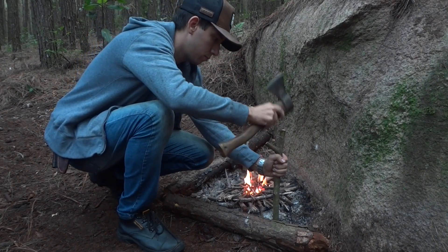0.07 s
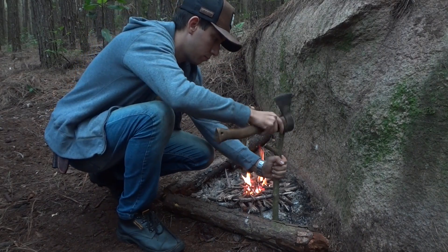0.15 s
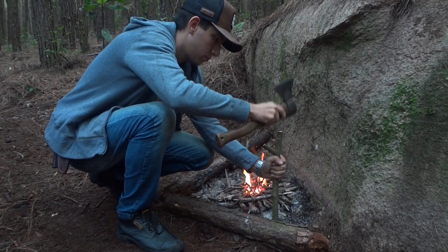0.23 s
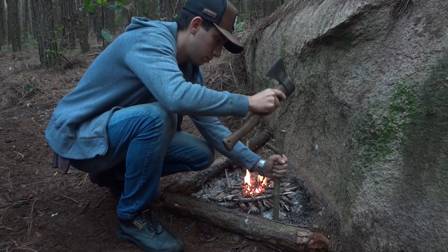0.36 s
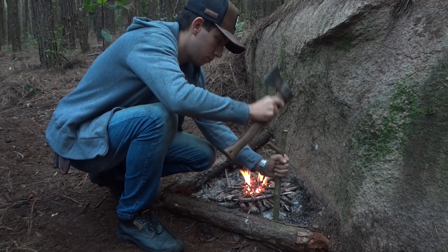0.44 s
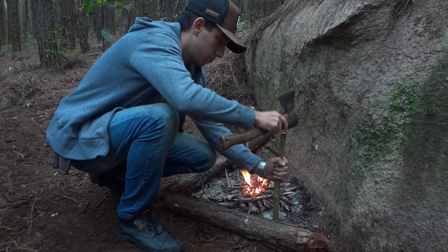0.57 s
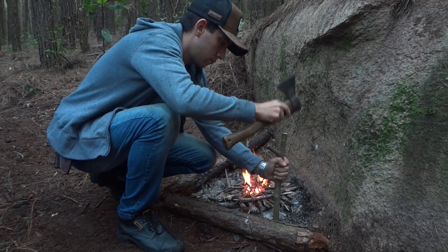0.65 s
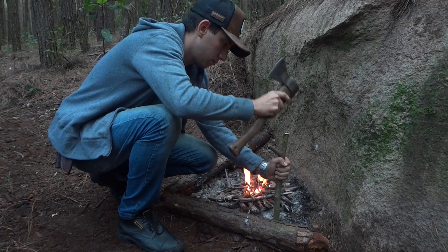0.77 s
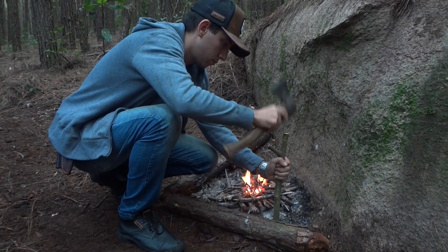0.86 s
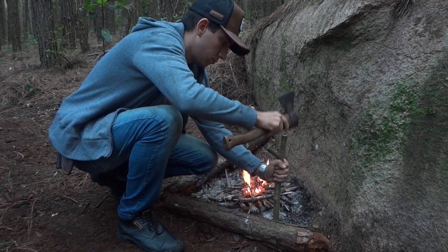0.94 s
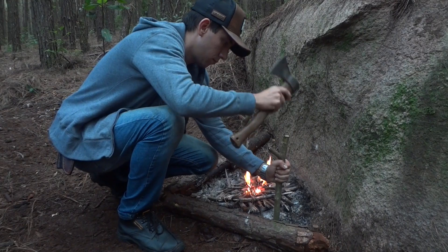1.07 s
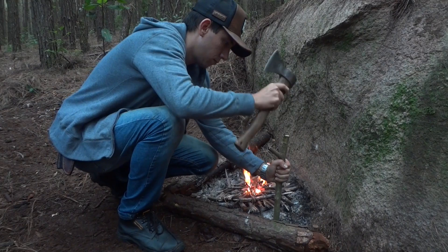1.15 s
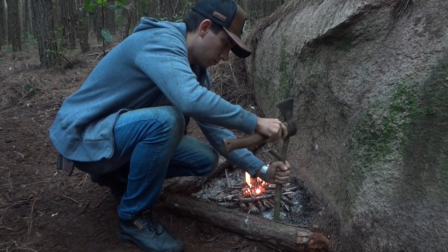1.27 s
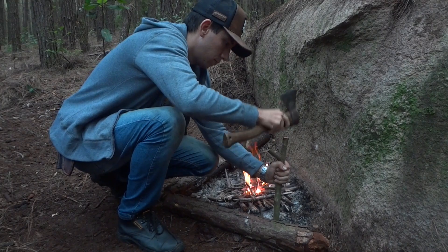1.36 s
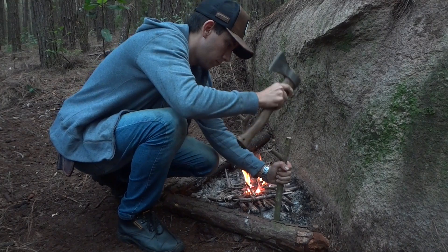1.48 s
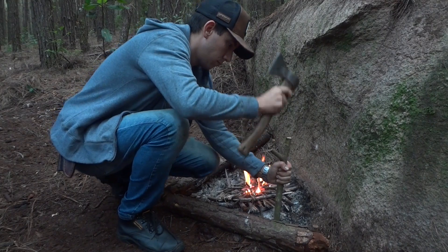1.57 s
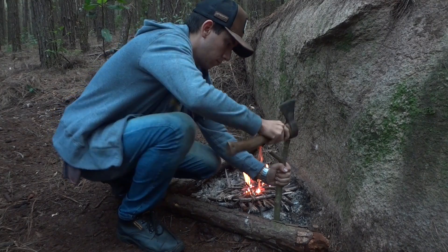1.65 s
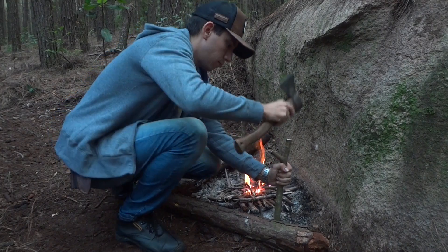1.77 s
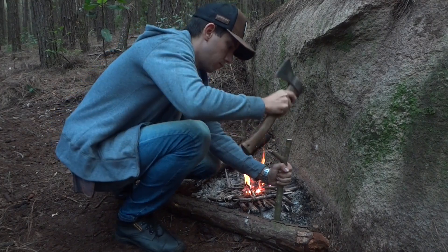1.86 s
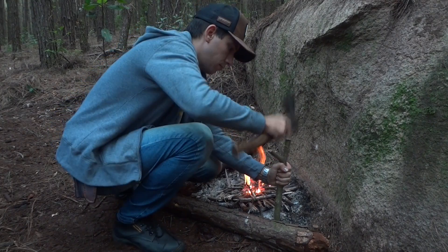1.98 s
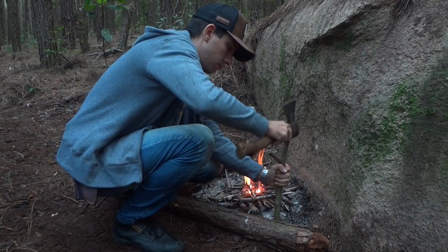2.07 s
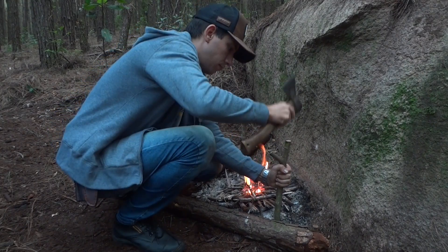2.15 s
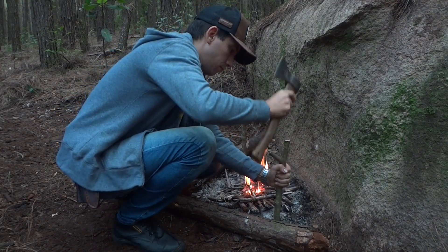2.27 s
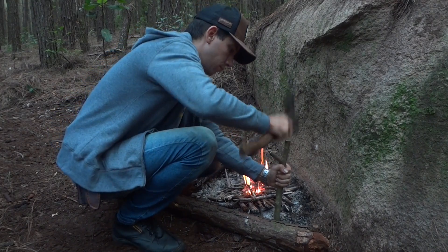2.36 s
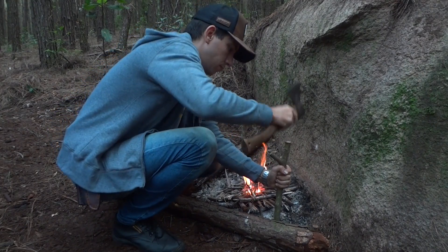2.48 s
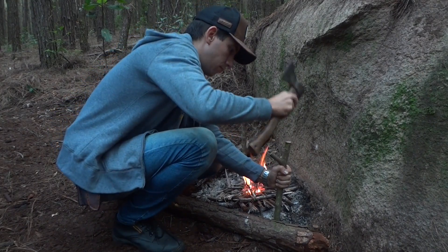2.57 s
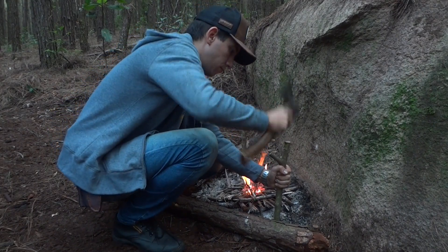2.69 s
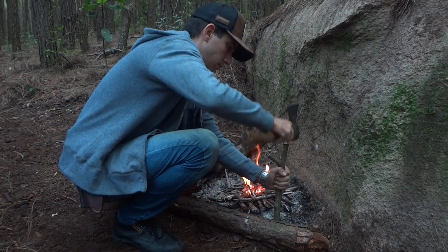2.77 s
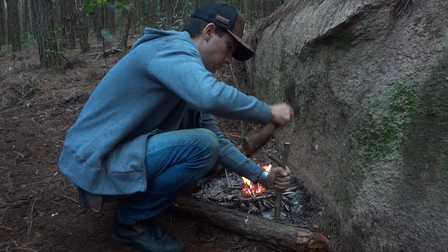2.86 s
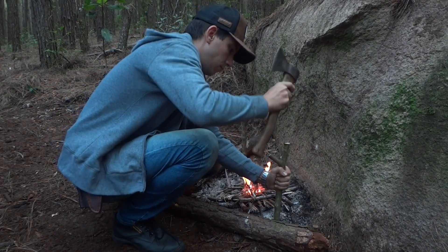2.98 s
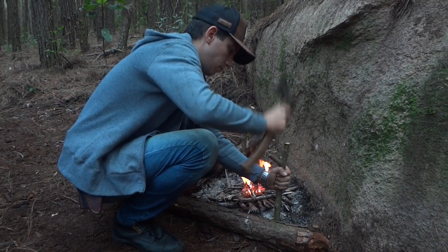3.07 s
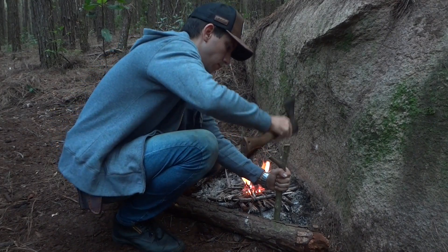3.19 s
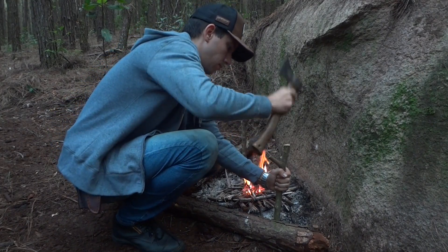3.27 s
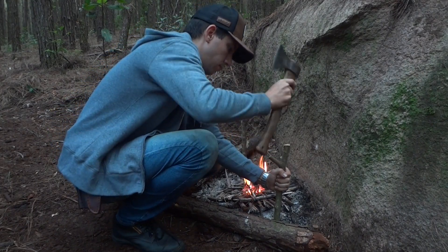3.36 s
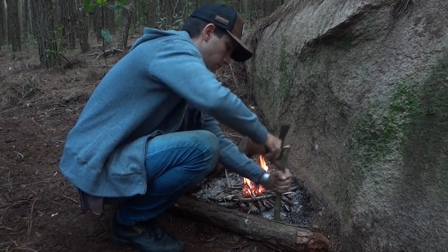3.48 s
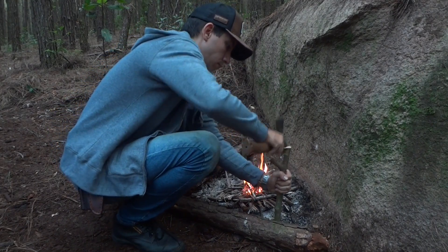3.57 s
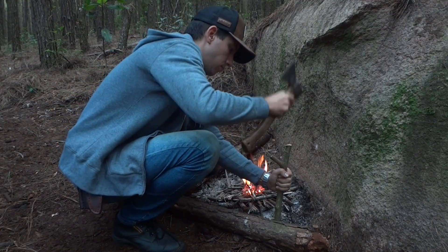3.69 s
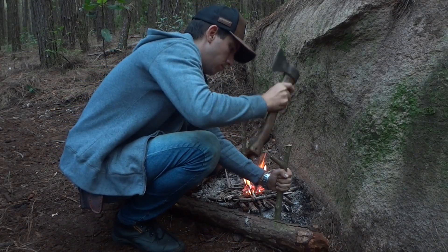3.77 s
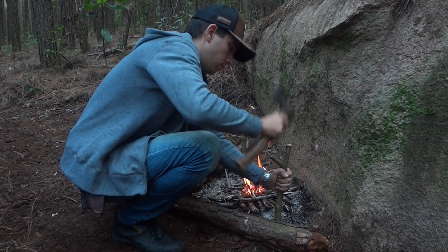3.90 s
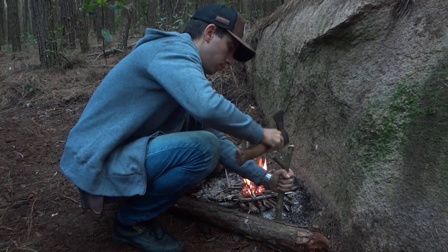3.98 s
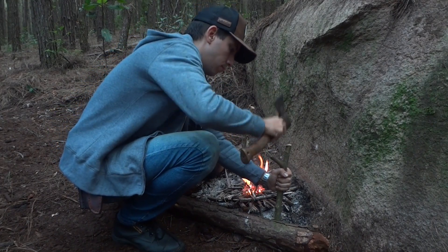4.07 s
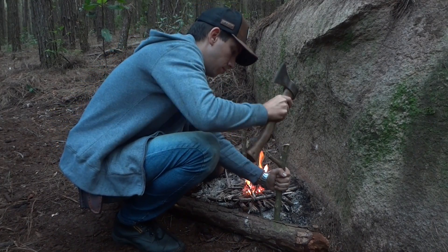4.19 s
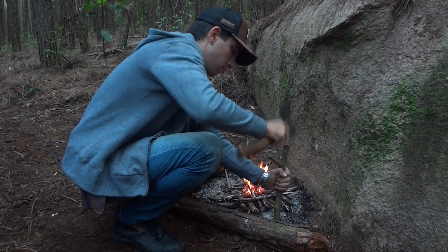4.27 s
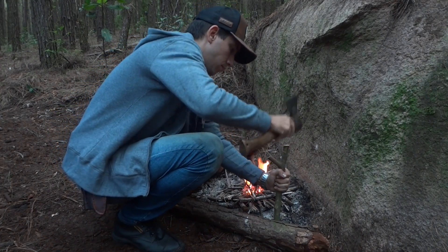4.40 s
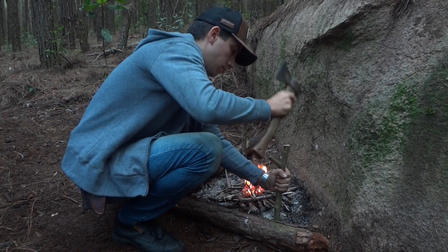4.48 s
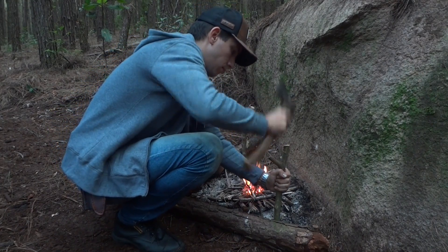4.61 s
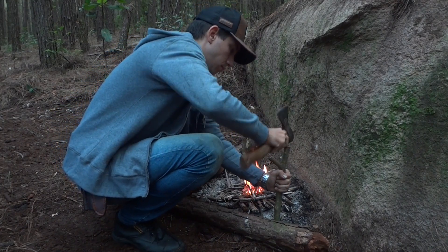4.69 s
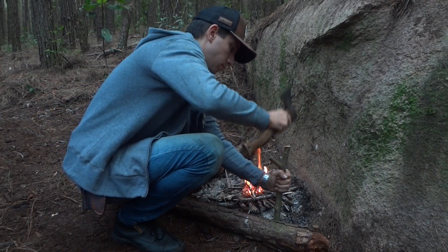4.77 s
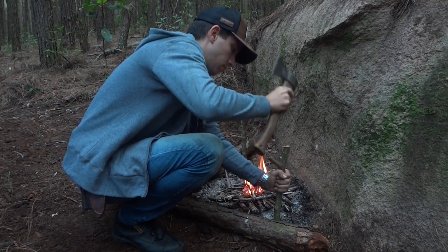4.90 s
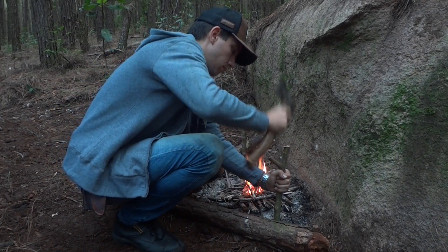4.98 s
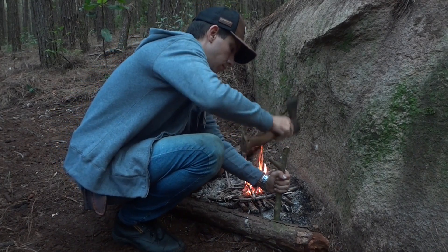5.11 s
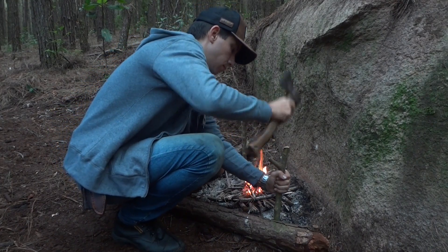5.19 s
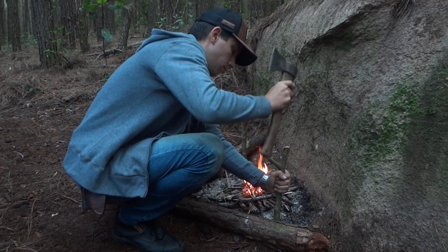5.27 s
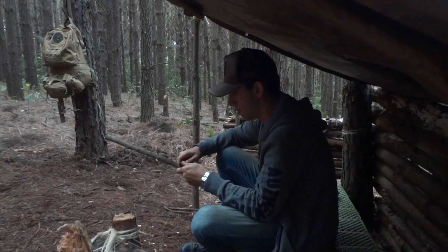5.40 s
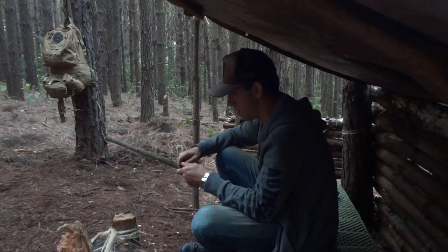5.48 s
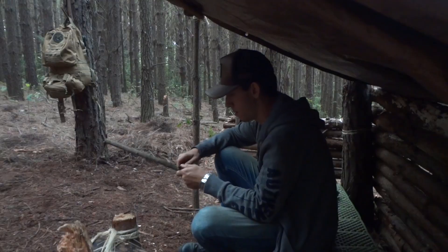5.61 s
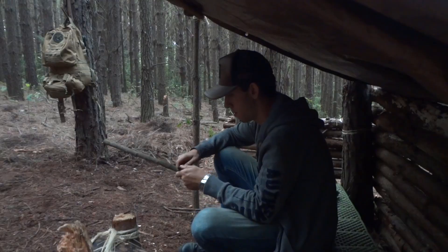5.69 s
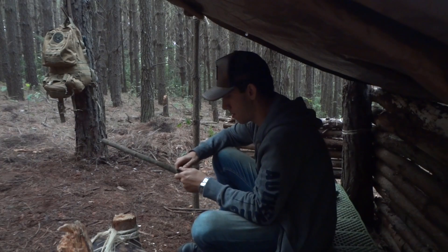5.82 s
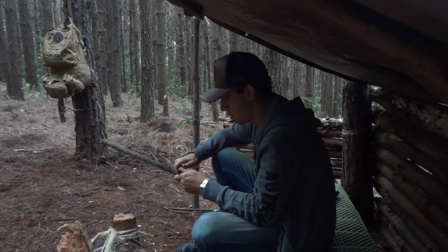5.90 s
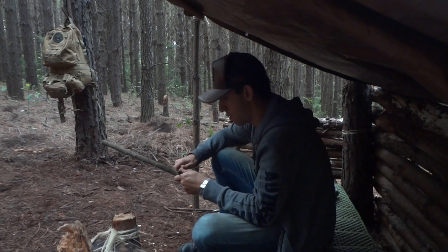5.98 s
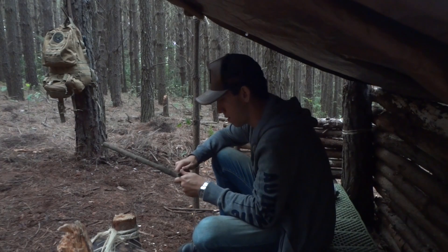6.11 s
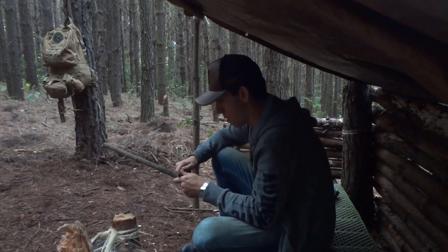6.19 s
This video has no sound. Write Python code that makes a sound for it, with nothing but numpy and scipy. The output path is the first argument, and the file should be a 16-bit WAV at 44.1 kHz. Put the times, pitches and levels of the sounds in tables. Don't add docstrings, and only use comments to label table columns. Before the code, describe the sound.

Rapid sharp wood knocks, about three a second, grow heavier with low earthy thuds and wrist-strap jingles in a quiet, cricket-filled forest.

```python
import sys
import numpy as np
from scipy import signal
from scipy.fft import rfft, irfft
from scipy.io import wavfile
from scipy.ndimage import uniform_filter1d

SR = 44100
rng = np.random.default_rng(int(sys.argv[2]) if len(sys.argv) > 2 else 0)


def linear_from_db(decibels):
    return 10 ** (np.asarray(decibels, float) / 20)


def file_out(sig):
    cols = np.atleast_2d(sig).T
    lim = np.clip(cols, -1, 1)
    pcm = np.round(lim * 32767).astype(np.int16)
    wavfile.write(sys.argv[1], SR, pcm)


N = 275625

# [f/Hz, level/dB]
AIR_COLOUR = [(15, -46), (28, -16), (70, -5.5), (180, -7), (700, -3), (1440, -5.5), (4700, -12),
              (16000, -16)]
# [f/Hz, side minus mid/dB]
AIR_SIDE = [(60, -16), (200, -0.5), (700, 5.5), (1290, 5.5), (2380, 3), (4400, -1.5), (8120, -11),
            (15000, -70)]
# [t/s, rms level/dB]
CHORUS = [(0, -75.5), (1, -78), (2, -77), (3, -76), (4.2, -81), (5.3, -85), (5.7, -73), (6.25, -75.5)]
# [f/Hz, level/dB, pulse rate/Hz]
SINGERS = [(4960, -3, 14), (5070, -1, 12), (5160, 0, 17), (5320, 0, 13)]
# [t/s, f/Hz, level/dB]
CHIRPS = [(.82, 6200, -71), (.89, 6300, -73), (1.82, 6700, -66), (1.92, 6700, -64), (2.19, 6700, -66),
          (5.42, 6230, -72), (5.585, 6700, -68), (5.755, 6800, -72), (5.92, 6230, -75), (5.985, 6230, -76),
          (6.05, 6230, -71), (6.115, 6230, -73), (6.185, 7200, -68)]
# [t/s, peak level/dB, centre f/Hz, width/Hz]
POPS = [
    (.068, -47, 1300, 700),
    (1.662, -46, 850, 500),
    (1.918, -43, 4500, 6500),
    (5.013, -56, 6000, 5000),
    (5.365, -45, 1100, 700),
]
# [f/Hz, level/dB, t60/s, side minus mid/dB]
FOREST = [(148, -34.5, 0.16, -16), (356, -43.5, 0.24, -2), (700, -40.5, 0.23, -7), (1370, -43.5, 0.37, 0),
          (2613, -35.5, 0.43, -8), (5070, -51, 0.08, -29), (10800, -57, 0.033, -25)]
# [f/Hz, level/dB]
SIDE_EARLY = [(60, -25), (150, -17), (400, -12), (1000, -13), (2500, -12), (5000, -17), (9000, -23),
              (14000, -19)]
# [f/Hz, level/dB]
SIDE_IN_STEP = [(400, -55), (1000, -24), (2500, -19), (5000, -23), (10000, -35)]
# [t/s, peak level/dB, centre f/Hz]
CLINKS = [(0.2064, -37, 6100), (0.216, -40, 5300), (0.2405, -41.5, 6300), (0.576, -32, 5600),
          (0.584, -32.5, 6030), (0.5956, -36, 6000), (0.945, -29, 6000), (0.956, -30, 5960),
          (1.3247, -28.5, 5870), (1.3297, -31, 6050), (1.3396, -31, 6200), (1.7026, -31, 12500),
          (1.7069, -31, 12900), (2.0765, -38, 5340), (2.0856, -38.5, 6670), (2.45, -34.5, 5800),
          (2.497, -44, 5190), (2.794, -30.5, 5870), (3.16, -37, 6100), (3.167, -37, 6560),
          (3.5578, -23.5, 5880), (3.582, -48, 5930), (3.993, -44, 5980), (4.0014, -44.5, 5900),
          (4.393, -41.5, 7940), (4.4954, -53, 5340), (4.7287, -35, 12500), (5.1002, -34, 7000),
          (5.107, -41, 8400), (5.1174, -45, 6830)]
# [f/Hz, level/dB, t60/s]
CLASP = [(3534, -13, 0.022), (5930, -12.5, 0.027)]
# [t/s, rms level/dB, held/s]
RUSTLE = [(.185, -37.5, 0.017), (.565, -32, .005), (.935, -32.5, .008), (1.312, -32.5, 0.019),
          (1.68, -35, 0.021), (2.05, -34, 0.018), (2.42, -39.5, 0.013), (2.765, -36.5, 0.026),
          (3.136, -36, 0.028), (3.527, -28, 0.017), (3.974, -38, 0.011), (4.352, -55, .1),
          (4.708, -42, .035), (5.075, -51, 0.1)]
# [f/Hz, t60/s, split/Hz, twin level/dB, twin t60/s]
HEAD = [(1376, .17, 10, -21, .36), (1872, .17, 5.5, -18, .7), (3482, .2, 8, -18, .22),
        (10770, .4, 6, -12, .4)]
# [t/s, rms level/dB of three low modes, freedom from the grip/0-1]
RINGS = [(0.181, -57.5, -67, -70, 0.34), (.561, -54.5, -63.5, -67, 0.48), (0.93, -48.5, -75, -61.5, 0.37),
         (1.309, -58.5, -60.5, -55.5, 0.43), (1.674, -39.5, -47, -52.5, 0.61),
         (2.047, -47.5, -51, -62, 0.43), (2.416, -31.5, -41.5, -55, 0.76), (2.764, -39.5, -43, -55, 0.72),
         (3.133, -55, -65, -81, 0.35), (3.516, -67, -57, -64, 0.39), (3.97, -74, -57, -86, 0.31),
         (4.349, -44, -41, -45.5, 0.98), (4.703, -53, -50.5, -77, 0.73), (5.069, -46, -48.5, -61, 0.83)]
# [t/s, level/dB, f/Hz, swing/s]
THUDS = [(.187, -49, 148, 0.0067), (0.565, -41, 186, 0.0073), (0.936, -51.5, 174, 0.03),
         (1.317, -32, 181, 0.011), (1.352, -51, 188, 0.012), (1.68, -28.5, 183, 0.0062),
         (2.053, -27.5, 150, 0.0083), (2.42, -30.5, 138, 0.015), (2.768, -30, 141, 0.017),
         (3.136, -25, 139, 0.017), (3.1729, -25.5, 174, 0.0076), (3.520, -26, 161.5, 0.011),
         (3.538, -25.5, 182, 0.0079), (3.974, -22.5, 177.5, 0.0058), (4.353, -24, 148, 0.0098),
         (4.7057, -22.5, 144, 0.013), (5.077, -22.5, 145, 0.011)]
# [f/Hz, level/dB, t60/s]
HOLLOW = [(324, -16, 0.01), (424, -23, 0.022), (518, 5, 0.032), (670, 3.5, 0.0086), (830, 2, 0.0059)]
# [f/Hz, level/dB, t60/s]
BODY = [(968, 1, 0.014), (1157, -3.5, 0.027), (1620, -8.5, 0.013), (1805, 2.5, 0.0086), (1920, -1.5, 0.033),
        (2478, 3, .012)]
# [f/Hz, level/dB, t60/s]
BRIGHT = [(2840, -2, 0.0032), (3070, 0, 0.0045), (3900, 4, 0.0078), (4530, 2, 0.022), (5340, 2, 0.0064),
          (6300, -12, 0.02), (7300, -10.5, 0.011), (9700, -35.5, .004), (12500, -27, 0.0026)]
# [t/s, crack peak level/dB, hollow rel level/dB, bright rel level/dB, contact/s]
BLOWS = [(0.18, -39.5, -7.5, -5, 0.0065), (0.561, -26, 1, -7.5, 0.0037), (0.9302, -21, -8, -5.5, 0.0058),
         (1.3096, -28, -4.5, -10, 0.0042), (1.6746, -22.5, -42, 0, 0.0041),
         (2.0471, -24, -10.5, 0.5, 0.0021), (2.4157, -17, -44, -2.5, 0.0067),
         (2.7621, -17.5, -22, -2, 0.0061), (3.1336, -22, -9.5, -5, 0.002), (3.5142, -20, -9, -9.5, 0.0072),
         (3.5317, -24, -1, 0.5, 0.0021), (3.9692, -17.5, -8.5, -10, 0.0052),
         (4.3494, -17.5, -15, -3, 0.0041), (4.7024, -14.5, -18.5, -7.5, 0.0036),
         (5.0704, -17.5, -12, -1, 0.0049)]
# [its level/dB, hollow f/Hz, body f/Hz,
# bright f/Hz, snap sent to the trunks/dB]
LANDING = [(-18, 1020, 1300, 3600, -29.5), (-16, 835, 1450, 3540, -24), (-11.5, 950, 1450, 3230, -23),
           (-13, 930, 940, 3550, -22.5), (-20, 860, 1770, 3370, -16), (-17, 680, 1630, 3490, -17.5),
           (-31, 900, 1650, 6000, -11.5), (-32, 1000, 1460, 9000, -11.5), (-12.5, 560, 1120, 3600, -19),
           (-12, 340, 1320, 4970, -29), (-19, 890, 1790, 3830, -20), (-13.5, 535, 1255, 3310, -20),
           (-17, 740, 1175, 7600, -13), (-20, 430, 1270, 4950, -16.5), (-18, 640, 1280, 3560, -11)]

AIR_DB, DISTANT_CHORUS_DB, THROB_DB = -63.5, -77, 4.5
ROCK_ECHO_S, ROCK_ECHO_DB = 0.02, 2.5
JOLT_LAG_S, JOLT_DB, JOLT_HZ, CLINK_T60_S = 0.0085, -34.5, 6100, 0.015
SLIDE_ATTACK_S, SLIDE_T60_S, SETTLE_DB, SETTLE_T60_S = 0.0013, 0.12, -15, 0.6
FREE_TOP_DB, GRIP_LOSS_DB = -63, 109
GRIP_WOBBLE_DB, GRIP_WOBBLE_RAD = 6.5, 2.5
REBOUND_PITCH = 0.9
TICK_DB, SNAP_TREBLE_DB = -14.5, -1.5
TOP_HZ = 15750


def shape(x, points):
    hz, db = np.transpose(points)
    f = np.maximum(np.arange(len(x) // 2 + 1) * SR / len(x), 1)
    return irfft(rfft(x) * linear_from_db(np.interp(np.log(f), np.log(hz), db)), len(x))


def high_pass(x, order, hz):
    return signal.sosfilt(signal.butter(order, hz, "highpass", fs=SR, output="sos"), x)


def band(x, lo_hz, hi_hz):
    edges = [lo_hz, min(hi_hz, 0.45 * SR)]
    return signal.sosfilt(signal.butter(2, edges, "bandpass", fs=SR, output="sos"), x)


def fade(t60, size):
    return np.exp(-np.log(1000) * np.arange(size) / SR / t60)


def ring(hz, t60, size, phase=0):
    return fade(t60, size) * np.sin(2 * np.pi * hz * np.arange(size) / SR + phase)


def unit(x):
    return x / np.max(np.abs(x))


def struck(push, hz, t60):
    return unit(signal.fftconvolve(push, ring(hz, t60, len(push)))[:len(push)])


def wander(count, hold, smooth):
    return uniform_filter1d(np.repeat(rng.standard_normal(count), hold), smooth)


def curve(table):
    return linear_from_db(np.interp(np.arange(N) / SR, *np.transpose(table)))


def add(out, s, x, pan_db=0):
    i = int(s * SR)
    x = x[:N - i]
    out[:, i:i + len(x)] += x * linear_from_db(np.array([[pan_db], [-pan_db]]) / 2)


def air():
    mid = shape(rng.standard_normal(N), AIR_COLOUR)
    side = shape(shape(rng.standard_normal(N), AIR_COLOUR), AIR_SIDE)
    return linear_from_db(AIR_DB) / np.std(mid) * np.array([mid + side, mid - side])


def crickets():
    out, t = np.zeros((2, N)), np.arange(N) / SR
    for hz, db, rate in SINGERS:
        timing, loudness = [wander(N // 2000 + 1, 2000, 3000)[:N] for _ in range(2)]
        gate = np.maximum(np.sin(2 * np.pi * rate * t + 3 * timing) + 0.5, 0) * linear_from_db(4 * loudness)
        song = gate * np.sin(2 * np.pi * hz * t + 6 * timing)
        lag = rng.integers(-2, 3)
        out += linear_from_db(db) * np.array([song, np.roll(song, lag)])
    throb = wander(N // 1500 + 1, 1500, 1000)[:N]
    out *= linear_from_db(THROB_DB * throb) * curve(CHORUS) / np.std(out)
    distant = band(band(rng.standard_normal(N), 4900, 5400), 4900, 5400)
    out += linear_from_db(DISTANT_CHORUS_DB) * distant / np.std(distant)
    for s, hz, db in CHIRPS:
        add(out, s - 0.012, linear_from_db(db) * np.hanning(1100) * np.sin(2 * np.pi * hz * t[:1100]))
    return out


def fire():
    out, size = np.zeros((2, N)), 1024
    for s, db, hz, width in POPS:
        pop = rng.standard_normal(size) * fade(0.012, size)
        add(out, s, linear_from_db(db) * unit(band(pop, hz - width / 2, hz + width)))
    return out


def forest(x):
    size = 24000
    t = np.arange(size) / SR
    rock = linear_from_db(ROCK_ECHO_DB) * np.exp(-((t - ROCK_ECHO_S) / 0.0037) ** 2)
    onset = np.minimum(t / 0.0033, 1) * (1 + rock)
    echo = np.zeros((2, size))
    for hz, db, t60, side_db in FOREST:
        noise = band(rng.standard_normal((2, size)), hz / np.sqrt(2), hz * np.sqrt(2))
        patchy = wander(size // 200, 200, 200)
        width = np.array([[1], [linear_from_db(side_db)]])
        echo += linear_from_db(db + 3 * patchy) * width * noise * fade(t60, size) * onset
    mid, side = signal.fftconvolve(x[None], echo, axes=1)[:, :N]
    return np.array([mid + side, mid - side])


def microphones(work):
    mid = work.mean(0)
    side = irfft(1j * rfft(shape(mid, SIDE_EARLY)), N) - shape(mid, SIDE_IN_STEP)
    return work + np.array([side, -side])


def strap():
    out, size = np.zeros((2, N)), 2048
    jolts = [(blow[0] + JOLT_LAG_S, JOLT_DB, JOLT_HZ) for blow in BLOWS]
    for s, db, hz in jolts + list(CLINKS):
        noise = rng.standard_normal(size) * fade(CLINK_T60_S, size)
        clink = band(noise, 0.92 * hz, 1.335 * hz) + 0.55 * band(noise, 5200, 12200)
        add(out, s - 0.0003, linear_from_db(db) * unit(clink), 3 * np.tanh(noise[0]))
        add(out, s, linear_from_db(db) * sum(linear_from_db(d) * struck(noise, f, t60) for f, d, t60 in CLASP))
    grains = np.repeat(rng.exponential(size=N // 60 + 1), 60)[:N]
    grit = band(rng.standard_normal(N) * linear_from_db(2.46 * grains), 2900, 15200)
    grit += linear_from_db(-9.5) * band(grit, 5380, 7320)
    slide, size = np.zeros((2, N)), 14000
    drop = fade(SLIDE_T60_S, size) + linear_from_db(SETTLE_DB) * fade(SETTLE_T60_S, size)
    for s, db, held in RUSTLE:
        hold = np.minimum(np.arange(int(held * SR)) / SR / SLIDE_ATTACK_S, 1)
        add(slide, s, linear_from_db(db) * np.r_[hold, drop])
    return out + linear_from_db(-12.5) * slide * grit / np.std(grit)


def head():
    out, size = np.zeros((2, N)), 20000
    swell = np.minimum(np.arange(size) / SR / 0.0066, 1)
    for s, *low_dbs, free in RINGS:
        sway = GRIP_WOBBLE_RAD * (1 - free) * wander(size // 500, 500, 500)
        dbs = low_dbs + [FREE_TOP_DB - GRIP_LOSS_DB * (1 - free)]
        for (hz, t60, split, twin_db, twin_t60), db in zip(HEAD, dbs):
            phase = 2 * np.pi * rng.random() + sway
            pair = ring(hz, free * t60, size, phase)
            pair += linear_from_db(twin_db) * ring(hz + split, free * twin_t60, size, phase)
            pair *= linear_from_db(GRIP_WOBBLE_DB * (1 - free) * wander(size // 400, 400, 400))
            add(out, s + 0.001048, linear_from_db(db + 1.61 / (free * t60)) * swell * pair)
    return out


def soil():
    out, size = np.zeros((2, N)), 12000
    t = np.arange(size) / SR
    sag = 1.04 - 3 * np.minimum(t, 0.04)
    for s, db, hz, swing in THUDS:
        envelope = np.minimum(t / 0.0038, 1) * np.exp(-(t / swing) ** 1.55)
        first = envelope * np.sin(2 * np.pi * hz * t * sag)
        rebound = np.clip((t - 0.025) / 0.013, 0, 1) * ring(REBOUND_PITCH * hz, 0.087, size)
        add(out, s - 0.003, -linear_from_db(db) * (first + linear_from_db(-12) * rebound), 0.5)
    return high_pass(out, 3, 75)


def stake():
    near, far, size = np.zeros((2, N)), np.zeros((2, N)), 2048
    t = np.arange(size) / SR
    click = 1.0 * (t == 0)
    snap = band(click, 420, 2817) + linear_from_db(SNAP_TREBLE_DB) * band(click, 2425, 11400)
    for blow, landing in zip(BLOWS, LANDING):
        s, db, hollow_db, bright_db, contact = blow
        top_db, *tops, far_db = landing
        force = np.minimum(t / 0.0008, 1) * np.exp(-(t / contact) ** 3)
        for modes, group_db, top_hz in zip((HOLLOW, BODY, BRIGHT), (hollow_db, 0, bright_db), tops):
            push = force * rng.standard_normal((10, size)) * np.exp(-t * top_hz / 12)
            detune = 1 + 0.03 * rng.standard_normal(10)
            wood = np.zeros(size)
            for k, (hz, mode_db, t60) in enumerate(modes):
                wood += linear_from_db(mode_db) * struck(push[k], hz * detune[k], t60)
            crack = linear_from_db(db) * unit(wood) + linear_from_db(top_db - 6) * struck(push[-1], top_hz, 0.011)
            add(near, s - 0.0006, linear_from_db(group_db) * crack)
        tick = unit(band(force * push[0], 4400, 13600))
        add(near, s, linear_from_db(db + bright_db + TICK_DB) * tick)
        add(far, s, linear_from_db(far_db) * snap)
    return high_pass(near, 2, 200), far


def scene():
    near, far = stake()
    thud, steel, links, pops = soil(), head(), strap(), fire()
    work = near + thud + steel + links + pops
    sent = linear_from_db(22) * far + linear_from_db(-3.5) * thud + linear_from_db(-6.5) * steel + linear_from_db(-7) * links + linear_from_db(-3.5) * pops
    return microphones(work) + forest(sent.mean(0)) + crickets() + air()


def roll_off(x):
    return signal.sosfilt(signal.butter(12, 16650, fs=SR, output="sos"), x)


def record(dry):
    dry = np.tanh(2.5 * dry) / 2.5
    dry = high_pass(dry, 2, 30)
    dry = signal.sosfilt(signal.ellip(8, 0.2, 25, TOP_HZ, fs=SR, output="sos"), dry)
    return roll_off(dry)


dry = scene()
out = record(dry)
file_out(out)
```